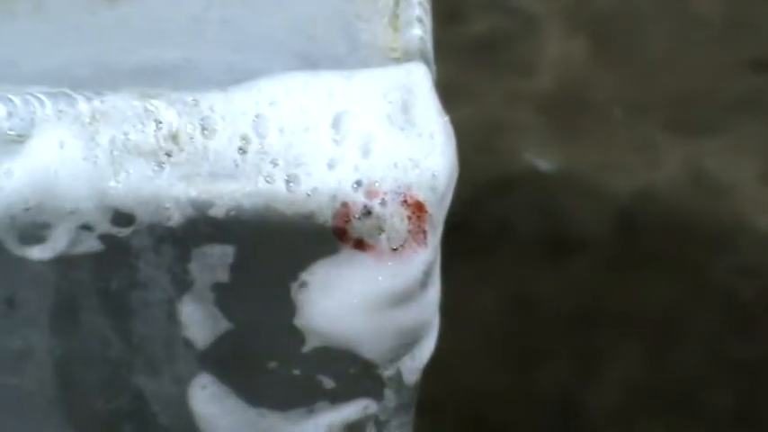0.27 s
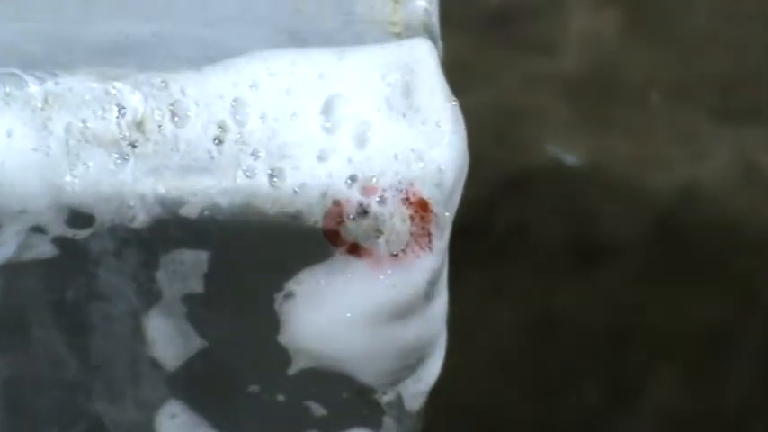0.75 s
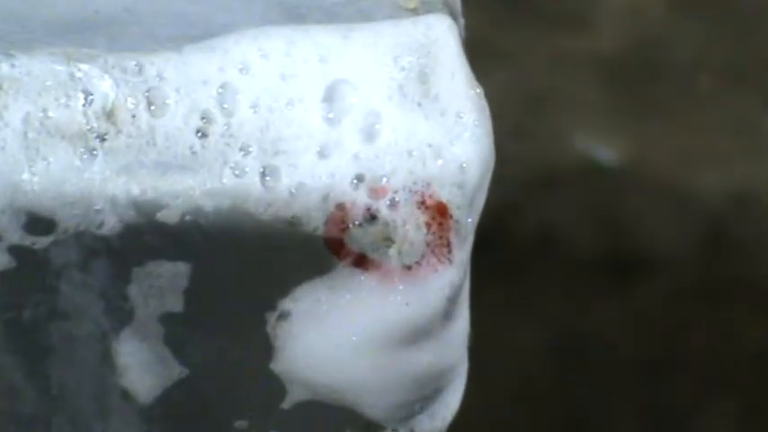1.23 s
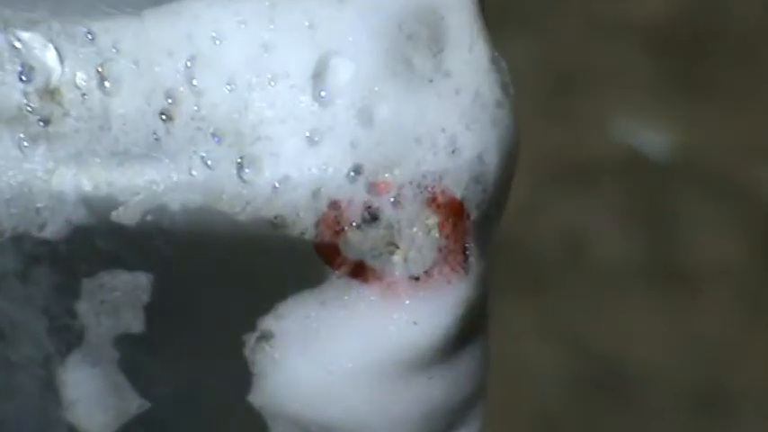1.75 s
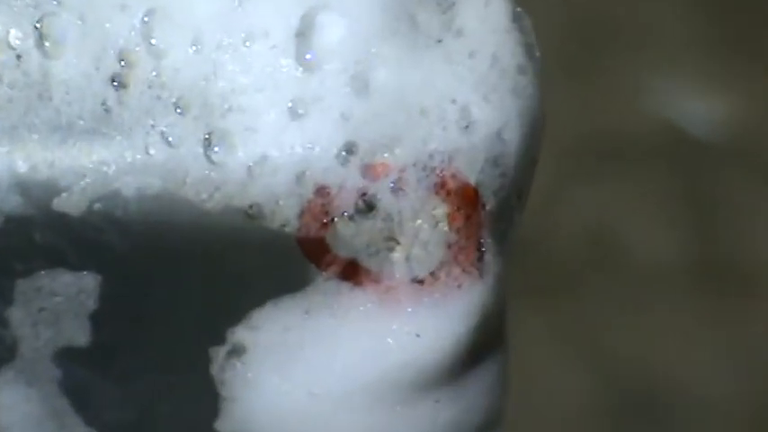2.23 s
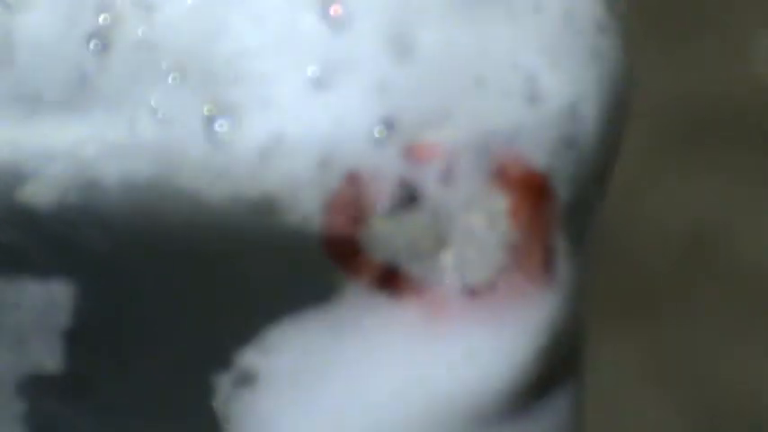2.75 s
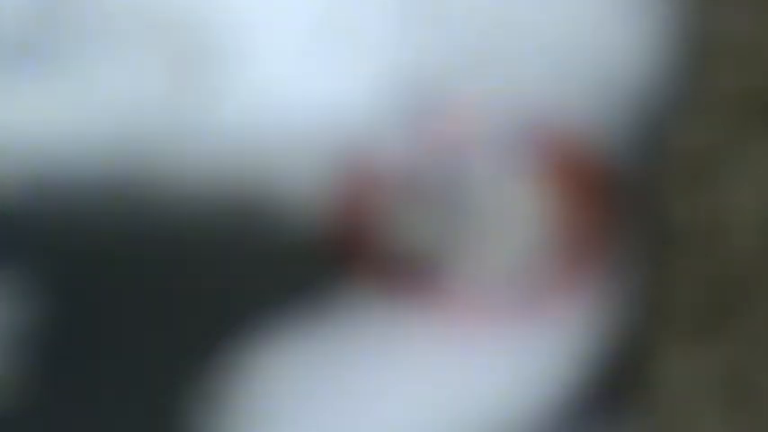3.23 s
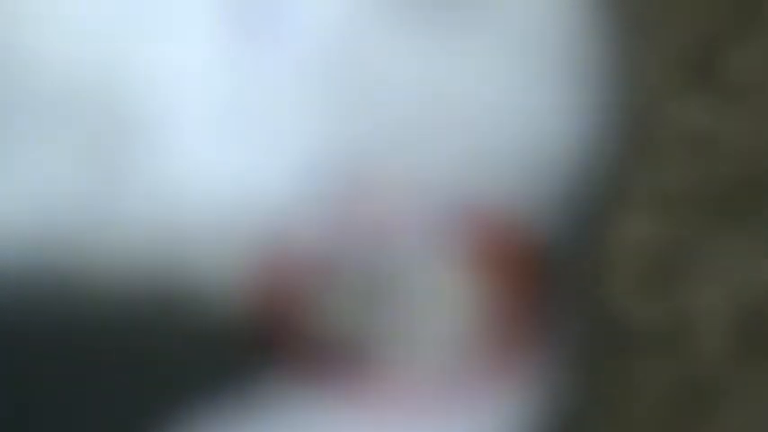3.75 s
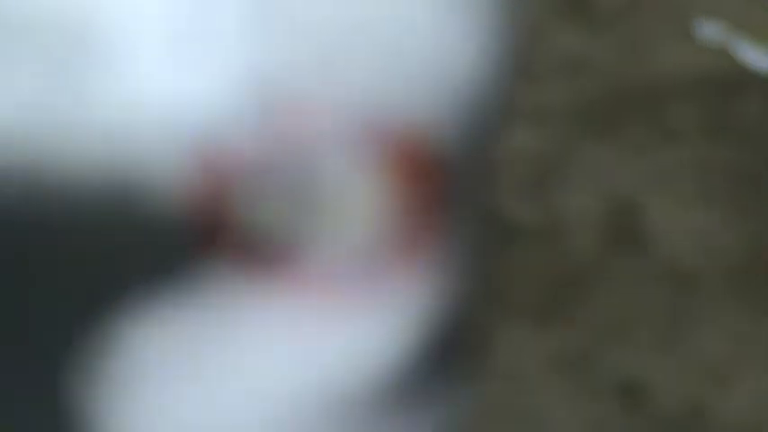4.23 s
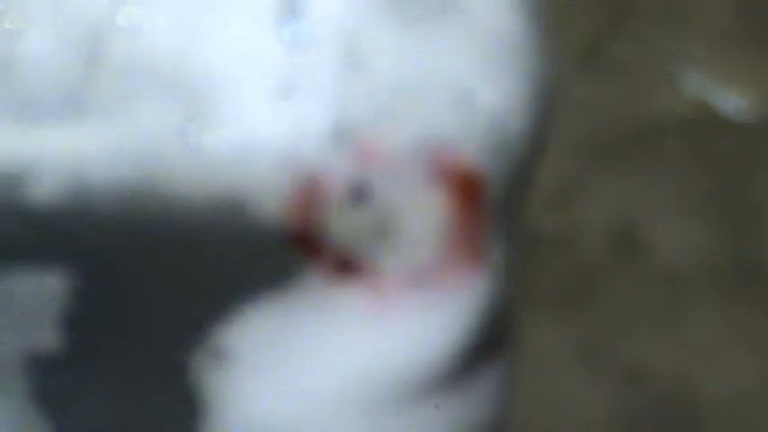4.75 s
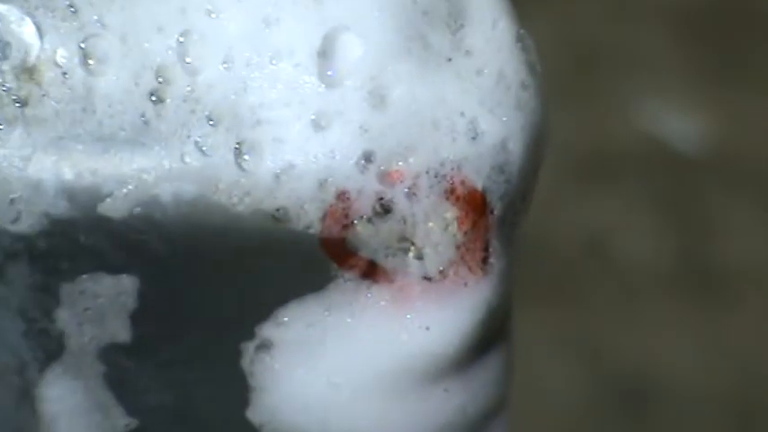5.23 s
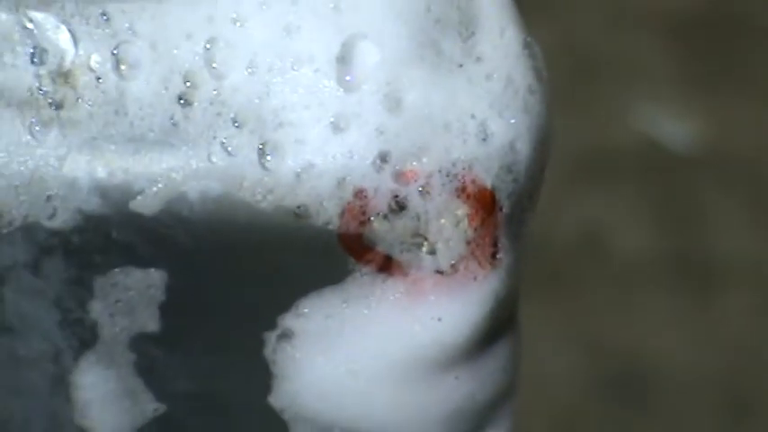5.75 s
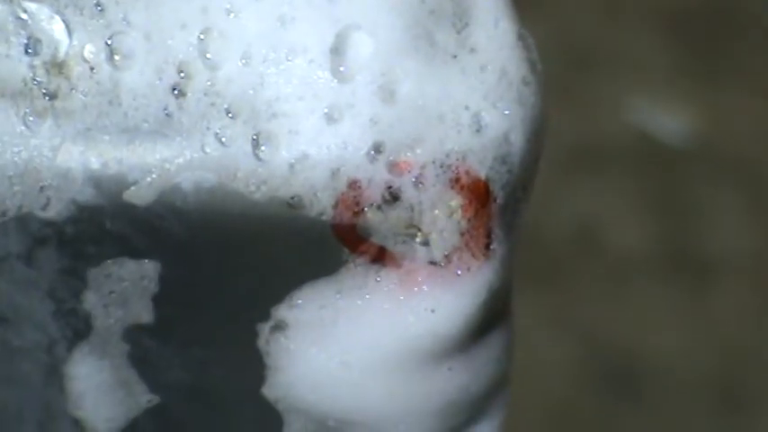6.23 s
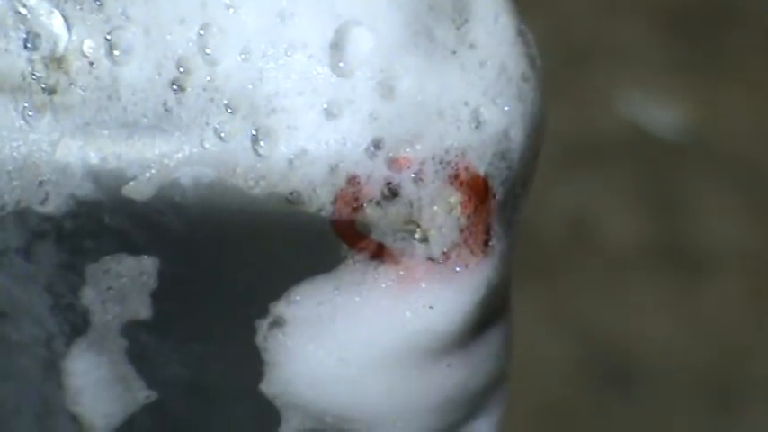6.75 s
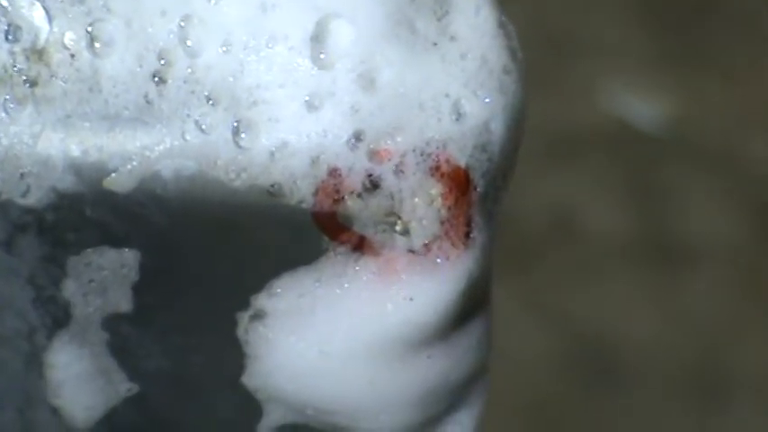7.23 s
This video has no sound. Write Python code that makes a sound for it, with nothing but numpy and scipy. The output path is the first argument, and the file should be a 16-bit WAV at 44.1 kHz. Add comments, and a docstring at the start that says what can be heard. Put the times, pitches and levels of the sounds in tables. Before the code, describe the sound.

A steady, bright hiss of compressed air runs throughout, strongest in the upper mids, colored by hollow ringing resonances of a steel tank over soft workshop background. A very thin high whistle rises during the first 1.7 seconds. At 0.8 a sharp metal tick sounds and the hiss sinks, losing treble, until it springs back around 1.2-1.3 with another tick. Fingers rustle and scuff close by from 1 to 2.2, with a plastic click at 1.9; more case clicks snap at 3.3 and 3.7. Faint rising whistled peeps appear from 4.3 to 5.4. At 5.6 ticks choke the flow again; it reopens at 5.9 with a bright tick. A wavering foam whistle sags, swoops down and up, then holds steady from 6.75. Near 7.25 fingers rustle, and at 7.4 a heavy low thud, scrape and slight squeak hit the microphone.

```python
"""Compressed air filling a soaped tank

Compressed air hisses through a hose coupling into a steel tank that is soaped for a leak test: shaped noise.
Twice the coupling ticks, chokes the flow and ticks open again: short noise bursts and ringing tones.
A pinhole whistles thinly, later through the foam: wavering tones with a fuzzy halo.
The hand-held camera rustles and clicks, and at the end its microphone is bumped and rubbed."""
import sys
import numpy as np
from scipy import signal
from scipy.fft import rfft, irfft, next_fast_len
from scipy.io import wavfile

SR = 44100
rng = np.random.default_rng(int(sys.argv[2]) if len(sys.argv) > 2 else 0)


def dump_mix(stems):
    """Bounce the given channels to the path in sys.argv[1] as a 16-bit WAV at rate SR."""
    frames = np.atleast_2d(stems).T  # one column per channel
    limited = np.clip(frames, -1, 1)  # hard clip at full scale
    pcm = np.round(limited * 32767).astype(np.int16)
    wavfile.write(sys.argv[1], SR, pcm)


N = 330485   # samples, about 7.5 s
TIME = np.arange(N) / SR
PADDED = next_fast_len(N)   # a length that transforms quickly
FREQS = np.maximum(np.fft.rfftfreq(PADDED, 1 / SR), 1)

# Noise colours give relative levels per Hz; the noise is scaled to its loudness afterwards.
# colour of the workshop and microphone background: f/Hz, level/dB
BACKGROUND_COLOUR = [(20, -3), (70, 8), (200, 0), (400, 3), (1500, -3), (6000, -23), (15000, 3)]
# how alike left and right are: f/Hz, likeness (0 to 1)
LEFT_RIGHT_LIKENESS = [(60, 1), (300, 0.78), (550, 0.8), (1000, 0.55), (2500, 0.8), (5000, 0.79),
                       (9000, 0.89), (15000, 0.85)]

# colour of fingers sliding: f/Hz, level/dB
RUSTLE_COLOUR = [(60, -27), (200, -9), (400, -8), (650, -2), (1700, -2), (2500, -6.5), (6000, -14),
                 (11000, -16), (15000, -30)]
# colour of the camera body's rumble: f/Hz, level/dB
RUMBLE_COLOUR = [(25, -34), (45, -24), (70, 0.5), (110, -5), (135, -3.5), (170, 3), (210, -11), (500, -20),
                 (2000, -83)]
# fingers slide over the case: start t/s, swell t/s, length with swell t/s, level/dB
SLIDES = [(0, .1, 2.25, -56), (0.908, 0.11, 0.11, -44.5), (1.217, 0.41, 0.56, -42), (1.95, .05, 0.3, -53.5),
          (7.25, 0.16, .24, -43.5)]
# the grip shifts and the camera body rumbles: start t/s, length t/s, level/dB
PRESSES = [(1.083, 0.15, -47.5), (1.293, 0.245, -56.5), (1.77, .06, -58), (2.03, .17, -59.5)]
# soft scuffs of the fingers: start t/s, level/dB, bottom f/Hz, top f/Hz, time to die by 60 dB t/s
SCUFFS = [(.995, -41, 940, 1400, 0.18), (1.455, -48, 192, 340, 0.1), (1.608, -32, 240, 1100, .05),
          (2.0, -30.5, 223, 2020, 0.26), (2.19, -48, 90, 262, 0.069), (3.72, -49, 200, 420, 0.067)]
# colour of the thud on the microphone: f/Hz, level/dB
THUD_COLOUR = [(20, -12), (45, -12), (70, 6), (125, 4), (175, -2.5), (225, -14.5), (400, -25), (1000, -66)]
# colour of the scrape on the microphone: f/Hz, level/dB
SCRAPE_COLOUR = [(200, -9), (550, 0), (950, -4), (1900, -5.5), (2700, 1), (3600, -11), (5200, -19),
                 (7000, -65), (15000, -55)]

# clicks of the plastic case: start t/s, level/dB, most excited f/Hz,
# then relative to the click: ring level/dB, snap level/dB
CASE_CLICKS = [(1.8963, -15, 1080, -3.5, -24), (3.2844, -14.2, 1850, .5, 5.5), (3.32, -31, 1800, -9, -20),
               (3.7381, -13.5, 1300, -4, -15), (3.79, -28.5, 1300, -10, -20)]
# colour of the case's crack: f/Hz, level/dB
CASE_COLOUR = [(100, -33), (300, -13), (700, -5), (1700, -1.5), (2700, -1), (4500, -1.5), (8500, -4.5),
               (12000, -15), (15000, -34)]
# ringing tones of the case: f/Hz, relative level/dB
CASE_MODES = [(670, 2.5), (1050, -1), (1750, 0), (2470, -2)]

# metal ticks of the coupling: start t/s, level/dB, most excited f/Hz,
# then relative to the tick: ring level/dB, workshop tail level/dB, tank knock level/dB
TICKS = [(0.8015, -21.5, 3900, -5, -11.5, -17), (.984, -40, 3900, -12, -16, -23),
         (1.016, -34, 9000, -10, -12, -22), (1.3016, -21, 6200, -14, -17, -34),
         (5.6239, -17.5, 11700, -4, -11, -37), (5.683, -34.5, 7900, 8, -14, -30),
         (5.806, -47.5, 3600, -12, -16, 5), (5.8232, -28, 9900, -5.5, -12, -8),
         (5.9428, -17, 6230, -4.5, -21, -45), (5.966, -33, 6500, 4, -25, -40)]
# colour of a tick's crack: f/Hz, level/dB
TICK_COLOUR = [(200, -35), (550, -4), (2500, 0), (3600, 8.5), (5000, 4), (6500, 8), (10000, -1),
               (11500, -3), (12700, 0), (15500, -3.5)]
# ringing tones of the coupling: f/Hz, relative level/dB, time to die by 60 dB t/s
COUPLING_MODES = [(3420, 2, .05), (4050, -2, 0.05), (6490, 4, 0.052), (6920, -4, 0.11), (8870, 3, 0.035),
                  (10350, -0.5, .05), (12400, -2, 0.033), (13250, -14, .13), (15550, -4, .1)]

# thin high whistle: t/s, f/Hz, level/dB before a shared gain
THIN_WHISTLE = [(0.1, 12698, -69), (0.234, 12827, -67), (0.396, 12796, -73), (0.528, 13216, -67),
                (0.59, 13851, -69), (0.694, 13855, -63), (0.748, 13978, -78), (0.808, 14084, -66),
                (0.96, 14702, -67), (1.506, 14606, -67), (1.72, 14790, -72)]
# whistles as the foam covers the pinhole: start t/s, length t/s, starting f/Hz, glide/(Hz per s), level/dB
PEEPS = [(4.29, 0.11, 9700, 2300, -53), (4.56, .08, 9750, 5000, -56), (4.76, .07, 10900, 2000, -56),
         (4.96, 0.45, 9850, 1052, -57), (6.75, 0.68, 8760, -1, -46)]
# the long foam whistle sags while the flow is choked: t/s, f/Hz, level/dB before a shared gain
FOAM_SAG = [(5.69, 9862, -56), (5.88, 9532, -56), (5.9, 9617, -54)]
# then it swoops: t/s, f/Hz, level/dB before a shared gain
FOAM_SWOOP = [(6.0, 9565, -55), (6.086, 10260, -57), (6.27, 8170, -48), (6.316, 8900, -56),
              (6.336, 9606, -52), (6.488, 9760, -53), (6.654, 10400, -58), (6.73, 10000, -51)]

# colour of the air jet: f/Hz, level/dB
JET_COLOUR = [(40, -26.5), (70, -14), (230, -18), (400, -21), (800, -23.5), (1500, -7.5), (2300, -5),
              (3300, -0.5), (4500, 0), (6500, -3), (8200, -7.5), (10300, -12), (13000, -20), (15500, -26.5)]
# boosts of the tank, dips where negative: f/Hz, width f/Hz, lift level/dB
TANK_MODES = [(186.4, 21.6, 8), (285.7, 22, 14), (498.5, 29, 15.5), (552, 47, 25), (611.5, 11, 20),
              (720, 156, 13), (924, 73, 16.5), (986, 31.6, 21.5), (1145, 200, 9), (1392, 87, 9.5),
              (1653, 40, 7.5), (1719, 22, 13), (1865, 120, 4), (2062, 65, 5.5), (2163, 33, 10.5),
              (2520, 38, 6.5), (2605, 53, 6.5), (2955, 24, 8.5), (3150, 14, 9), (3294, 28, 7),
              (3405, 22, 7.5), (3676, 8.3, 12), (3806, 34, 7), (4060, 13, 9), (6000, 15, -2),
              (6520, 32, -7), (6910, 200, 3.5), (8240, 370, 5.5)]
# change of the tank's low tones at the moving microphone: t/s, level/dB
LOW_MODES = [(0, -.8), (2.6, -.3), (4.2, 1.3), (5.6, 0)]
# the coupling chokes the air: starts to close t/s, starts to open t/s, recovery time constant t/s
CHOKES = [(0.823, 1.219, 0.044), (5.655, 5.892, 0.032)]


def from_db(db):
    """Turn decibels into gain."""
    return 10 ** (np.asarray(db) / 20)


def rms_one(x):
    """Scale to an average strength (rms) of 1."""
    return x / np.sqrt(np.mean(x ** 2) + 1e-20)


def in_time(rows):
    """Join the rows of a curve by straight lines, one signal per column after the time."""
    s, *columns = np.transpose(rows)
    return [np.interp(TIME, s, c) for c in columns]


def over_hz(points):
    """Join the points of a spectrum on a log-frequency axis."""
    hz, value = np.transpose(points)
    return np.interp(np.log(FREQS), np.log(hz), value)


def wander(steps, size=N):
    """Random values of rms 1, joined by straight lines, with `steps` steps along the length."""
    knots = rng.standard_normal(8192)
    return rms_one(np.interp(np.linspace(0, steps, size), np.arange(len(knots)), knots))


def drift(per_s):
    """Wander in time, with so many steps per second."""
    return wander(per_s * N / SR)


def noise(gain):
    """Stereo noise of rms 1, shaped by a gain per frequency."""
    mid, side = rfft(rng.standard_normal((2, PADDED)))
    alike = np.clip(over_hz(LEFT_RIGHT_LIKENESS), 0, 1)
    both = np.sqrt(1 + alike) * mid + np.sqrt(1 - alike) * side * [[1], [-1]]
    return rms_one(irfft(both * gain, PADDED)[:, :N])


def coloured_noise(colour):
    """Stereo noise of rms 1 that follows a colour table."""
    return noise(from_db(over_hz(colour)))


def panned(x, pan_db):
    """Make left louder than right by pan_db; a negative value leans right."""
    return x * from_db([[pan_db / 2], [-pan_db / 2]])


def tone(hz):
    """A sine of rms 1 on a moving pitch."""
    return np.sqrt(2) * np.sin(2 * np.pi * np.cumsum(hz) / SR)


def dying(age, t60):
    """Envelope that starts at age 0 and loses 60 dB in t60 seconds."""
    return (age >= 0) * from_db(-60 * np.maximum(age, 0) / t60)


def stroke(s, attack_s, length_s, release_t60):
    """Envelope that swells from s, holds until length_s is over and then dies away."""
    age = TIME - s
    swell = np.sin(np.pi / 2 * np.clip(age / attack_s, 0, 1)) ** 2
    return swell * dying(np.maximum(age - length_s, 0), release_t60)


def after(s):
    """The half second that follows a moment, and the age of its samples."""
    span = slice(int(s * SR), int((s + .5) * SR))
    return span, TIME[span] - TIME[span][0]


def ringing(age, hz, t60):
    """One struck tone that dies away."""
    return dying(age, t60) * np.cos(2 * np.pi * hz * age)


def struck_at(hz, focus_hz, octaves):
    """A blow wakes most the tones near its own focus pitch."""
    return 1 / (1 + (np.log2(hz / focus_hz) / octaves) ** 2)


def workshop_background(level_db=-62.5):
    """Steady soft noise of the workshop and the microphone."""
    return from_db(level_db) * coloured_noise(BACKGROUND_COLOUR)


def handling(slide_release_t60=0.56, press_attack_s=0.015, press_release_t60=0.4, grip_db=1.5):
    """Fingers slide on the case with an uneven rustle, and the shifting grip makes the body rumble."""
    sliding = sum(from_db(db) * stroke(s, swell_s, length_s, slide_release_t60)
                  for s, swell_s, length_s, db in SLIDES)
    pressing = sum(from_db(db) * stroke(s, press_attack_s, length_s, press_release_t60)
                   for s, length_s, db in PRESSES)
    rustle = sliding * from_db(grip_db * drift(150)) * coloured_noise(RUSTLE_COLOUR)
    rumble = pressing * coloured_noise(RUMBLE_COLOUR)
    return rustle + rumble


def scuffs(rise_s=0.0019):
    """A fingertip slides briefly on the case: a dull puff of noise with a soft start."""
    out, grain = np.zeros((2, N)), noise(1)
    for s, db, bottom_hz, top_hz, t60 in SCUFFS:
        span, age = after(s)
        band = signal.butter(2, [bottom_hz, top_hz], "band", fs=SR, output="sos")
        puff = rms_one(signal.sosfiltfilt(band, grain[:, span]))
        soft_start = 1 - np.exp(-age / rise_s)
        out[:, span] += from_db(db) * puff * dying(age, t60) * soft_start
    return out


def microphone_bump(bump_s=7.434, thud_db=-7.5, thud_attack_s=0.011, thud_t60=0.25,
                    drag_s=7.448, drag_attack_s=0.017, drag_length_s=0.05, drag_release_t60=0.56,
                    scrape_db=-20.5, slip_db=0.0, squeak_db=-24, squeak_hz=745, squeak_waver_hz=12):
    """A finger knocks the microphone with a low thud, then drags over it with a scrape and a squeak."""
    knocking = stroke(bump_s, thud_attack_s, thud_attack_s, thud_t60)
    dragging = stroke(drag_s, drag_attack_s, drag_length_s, drag_release_t60)
    thud = knocking * from_db(thud_db) * coloured_noise(THUD_COLOUR)
    scrape = dragging * from_db(scrape_db + slip_db * drift(280)) * coloured_noise(SCRAPE_COLOUR)
    squeak = dragging * from_db(squeak_db) * tone(squeak_hz + squeak_waver_hz * drift(100))
    return thud + scrape + squeak


def case_clicks(split_hz=3000, low_t60=0.024, high_t60=0.0067, ring_t60=0.028, focus_octaves=0.45,
                snap_hz=8600, snap_width_hz=1900, tail_db=-25, tail_t60=0.48, rise_s=0.00008, lowest_hz=170):
    """The plastic case snaps beside the microphone: the treble goes at once, the shell rings longer."""
    out, grain = np.zeros((2, N)), coloured_noise(CASE_COLOUR)
    low = signal.sosfiltfilt(signal.butter(2, split_hz, fs=SR, output="sos"), grain)
    high = grain - low
    snap = noise(1 / (1 + (2 * (FREQS - snap_hz) / snap_width_hz) ** 2) ** 2)
    for s, db, focus_hz, ring_db, snap_db in CASE_CLICKS:
        span, age = after(s)
        treble = (high[:, span] + from_db(snap_db) * snap[:, span]) * dying(age, high_t60)
        shell = low[:, span] * (dying(age, low_t60) + from_db(tail_db) * dying(age, tail_t60))
        ring = sum(from_db(mode_db) * struck_at(hz, focus_hz, focus_octaves) * ringing(age, hz, ring_t60)
                   for hz, mode_db in CASE_MODES)
        click = treble + shell + from_db(ring_db) * ring
        soft_start = 1 - np.exp(-age / rise_s)   # plastic gives a little on contact
        out[:, span] += from_db(db) * click * soft_start
    # the small shell gives off little bass
    return signal.sosfilt(signal.butter(2, lowest_hz, "high", fs=SR, output="sos"), out)


def coupling_ticks(crack_t60=0.007, echo_s=0.00247, echo_db=-8, room_t60=0.18, focus_octaves=0.15,
                   knock_hz=550, knock_t60=0.049):
    """A sharp crack, its echo off the tank wall, the ringing fitting, a tank knock and a workshop tail."""
    out, grain = np.zeros((2, N)), coloured_noise(TICK_COLOUR)
    for s, db, focus_hz, ring_db, tail_db, knock_db in TICKS:
        span, age = after(s)
        echo = from_db(echo_db) * dying(age - echo_s, crack_t60)
        crack = np.hypot(dying(age, crack_t60), echo)
        tail = from_db(tail_db) * dying(age, room_t60)
        burst = grain[:, span] * np.hypot(crack, tail)
        ring = sum(from_db(mode_db) * struck_at(hz, focus_hz, focus_octaves) * ringing(age, hz, t60)
                   for hz, mode_db, t60 in COUPLING_MODES)
        knock = from_db(knock_db) * ringing(age, knock_hz, knock_t60)
        out[:, span] += from_db(db) * (burst + from_db(ring_db) * ring + knock)
    return panned(out, pan_db=-3.0)


def whistle(hz, gain, waver_hz, jitter_hz, flicker_db, halo_db=-13):
    """Air sings in the wet pinhole: a wavering tone, with a fuzzy halo where the foam disturbs the jet."""
    hz = hz + waver_hz * (drift(45) + drift(12))
    line = tone(hz + jitter_hz * drift(1000))
    halo = from_db(halo_db) * drift(700) * tone(hz)
    flicker = from_db(flicker_db * drift(70))
    return gain * flicker * rms_one(line + halo)


def whistle_envelope(s, length_s):
    """A whistle swells quickly, holds and fades."""
    return stroke(s, attack_s=0.018, length_s=length_s, release_t60=0.1)


def long_note(rows, gain_db):
    """Pitch and gain of a whistle that slides along a curve."""
    hz, level_db = in_time(rows)
    start_s, end_s = rows[0][0], rows[-1][0]
    return hz, from_db(level_db + gain_db) * whistle_envelope(start_s, end_s - start_s)


def pinhole():
    """First a thin high whistle; later, through the foam, rising peeps, a long sliding note and a held one."""
    notes = [long_note(FOAM_SAG + FOAM_SWOOP, gain_db=4.5)]
    for s, length_s, start_hz, glide_hz_per_s, db in PEEPS:
        hz = start_hz + glide_hz_per_s * np.clip(TIME - s, 0, length_s)
        notes.append((hz, from_db(db) * whistle_envelope(s, length_s)))
    pitches, gains = zip(*notes)
    # through the foam the hole sings one note at a time: the strongest
    pitch = np.choose(np.argmax(gains, axis=0), pitches)
    foam = whistle(pitch, np.max(gains, axis=0), waver_hz=50, jitter_hz=100, flicker_db=2.4)
    thin_hz, thin_gain = long_note(THIN_WHISTLE, gain_db=2.0)
    thin = whistle(thin_hz, thin_gain, waver_hz=18, jitter_hz=25, flicker_db=2.5, halo_db=-14)
    return panned(thin + foam, pan_db=-3.0)


def flow(closing_db_per_s=66, most_loss_db=22):
    """Air flow in dB: it sinks steadily while the coupling closes and springs back when it opens."""
    flow_db = np.zeros(N)
    for closes, opens, recovery_s in CHOKES:
        closing_s = np.minimum(TIME, opens) - closes
        loss_db = np.clip(closing_db_per_s * closing_s, 0, most_loss_db)
        flow_db -= loss_db * np.exp(-np.maximum(TIME - opens, 0) / recovery_s)
    return flow_db


def tank_response(ripple_db, mode_spacing_hz):
    """Strong tank tones stand out of a thicket of weak ones, which differs from left to right."""
    strong = sum((from_db(db) ** 2 - 1) / (1 + (2 * (FREQS - hz) / width) ** 2) ** 2
                 for hz, width, db in TANK_MODES)
    shared, left, right = [wander(SR / 2 / mode_spacing_hz, size=len(FREQS)) for _ in range(3)]
    ripple = np.tanh(shared + 1.5 * np.array([left, right])) * np.minimum(FREQS / 1200, 1)
    thicket = from_db(ripple_db * ripple) ** 2
    return np.sqrt(np.maximum(strong + thicket, 1e-3))   # power to gain


def air(hiss_db=-37.0, boom_db=-51.5, boom_hz=800, boom_follow=0.3, flutter_db=0.16):
    """The jet drives the tank; when it is choked the treble sinks far more than the low tones."""
    flow_db = flow()
    colour = from_db(over_hz(JET_COLOUR)) * tank_response(ripple_db=4.5, mode_spacing_hz=23.93)
    low_share = 1 / (1 + (FREQS / boom_hz) ** 6)   # share of the power that goes to the boom
    hiss_level_db = hiss_db + flow_db + flutter_db * drift(25)
    hiss = from_db(hiss_level_db) * noise(colour * np.sqrt(1 - low_share))
    boom_level_db = boom_db + in_time(LOW_MODES)[0] + boom_follow * flow_db
    boom = from_db(boom_level_db) * noise(colour * np.sqrt(low_share))
    return panned(hiss, pan_db=0.56) + panned(boom, pan_db=-0.3)


def scene():
    """Workshop background, the camera's own noises at the microphone, then the coupling, leak and tank."""
    camera = handling() + scuffs() + microphone_bump() + case_clicks()
    tank = coupling_ticks() + pinhole() + air()
    return workshop_background() + camera + tank


def record(dry, ceiling=0.6, cutoff_hz=15900):
    """The loudest peaks are rounded and the top of the treble is cut steeply."""
    rounded = ceiling * np.tanh(dry / ceiling)
    return signal.sosfilt(signal.ellip(10, .1, 80, cutoff_hz, fs=SR, output="sos"), rounded)


dry = scene()
out = record(dry)
dump_mix(out)
```